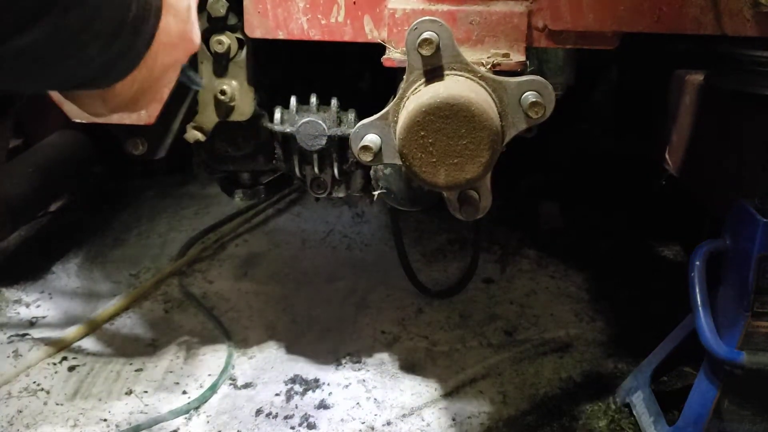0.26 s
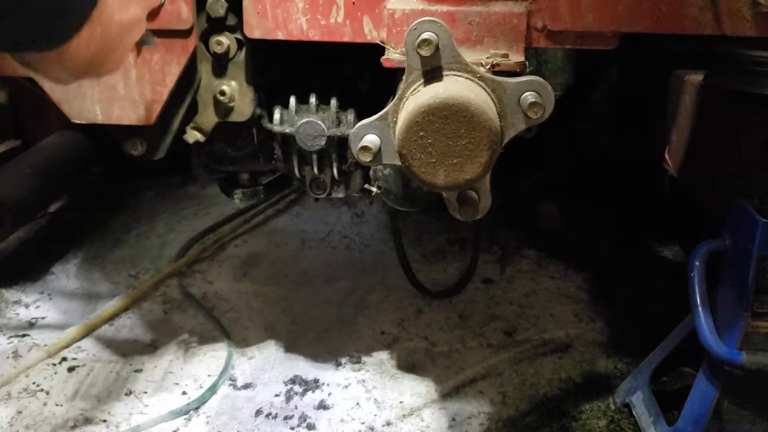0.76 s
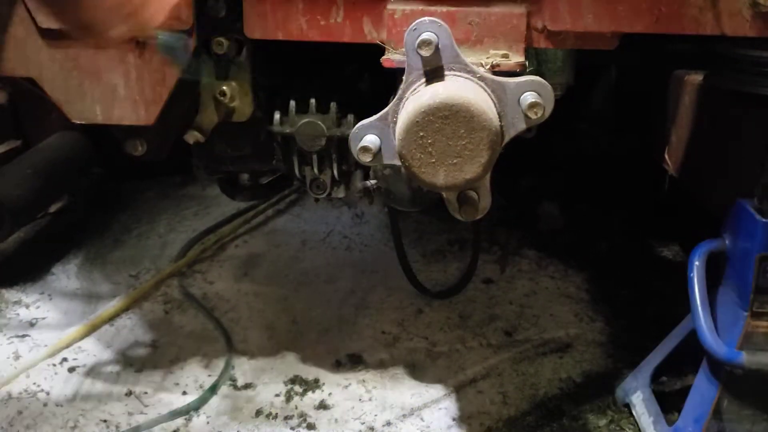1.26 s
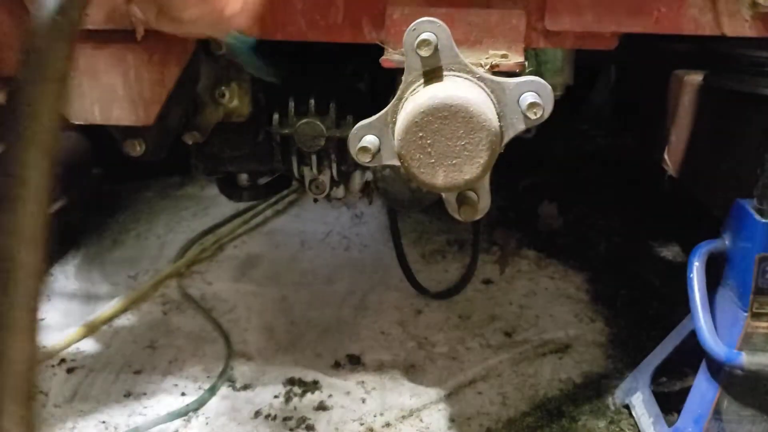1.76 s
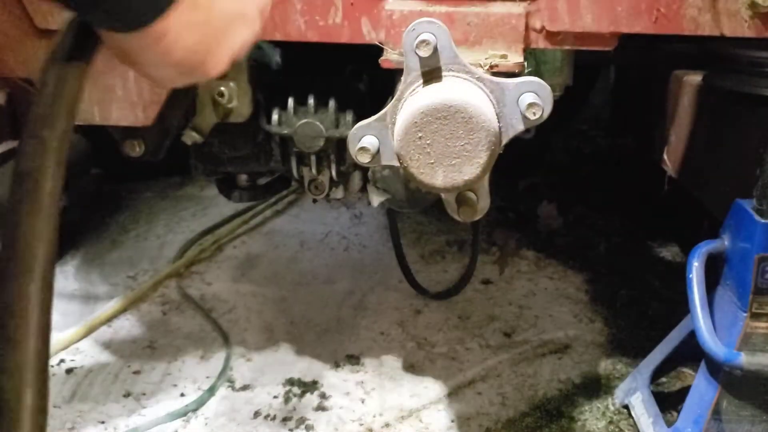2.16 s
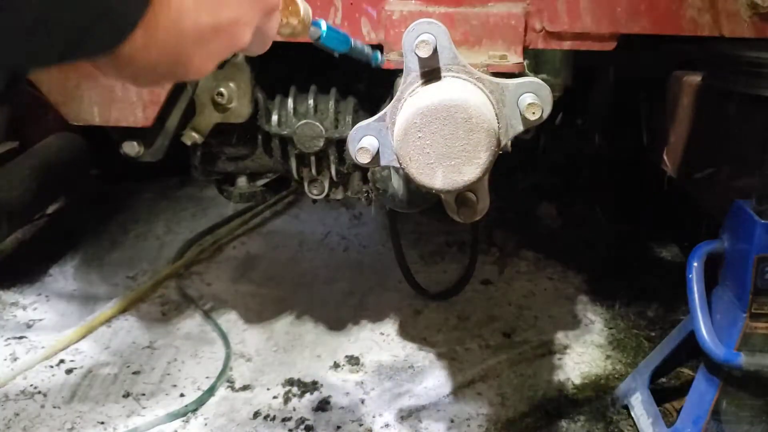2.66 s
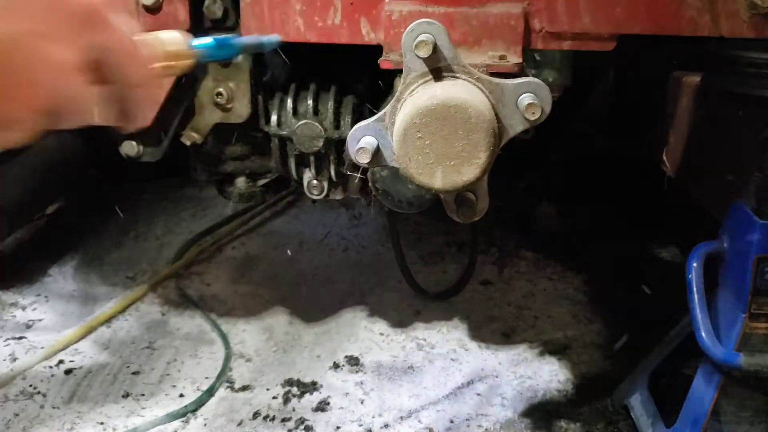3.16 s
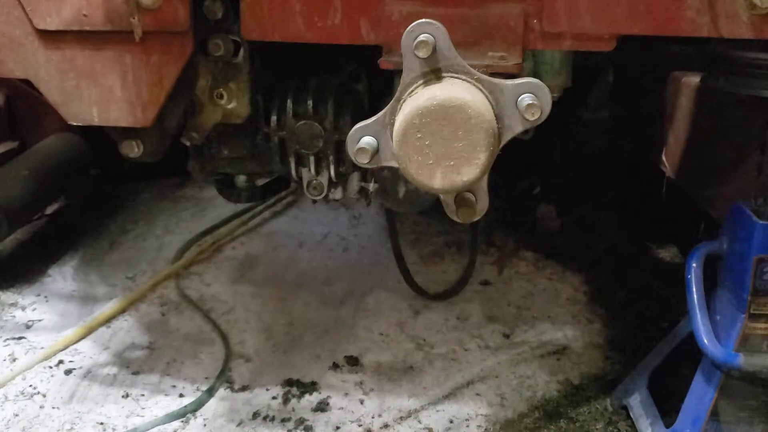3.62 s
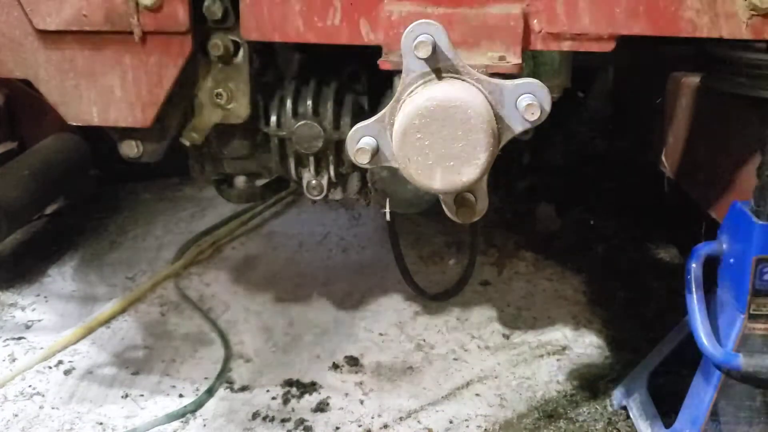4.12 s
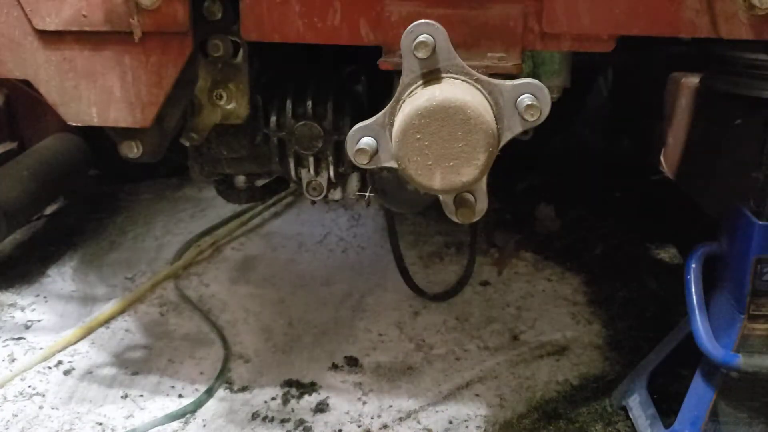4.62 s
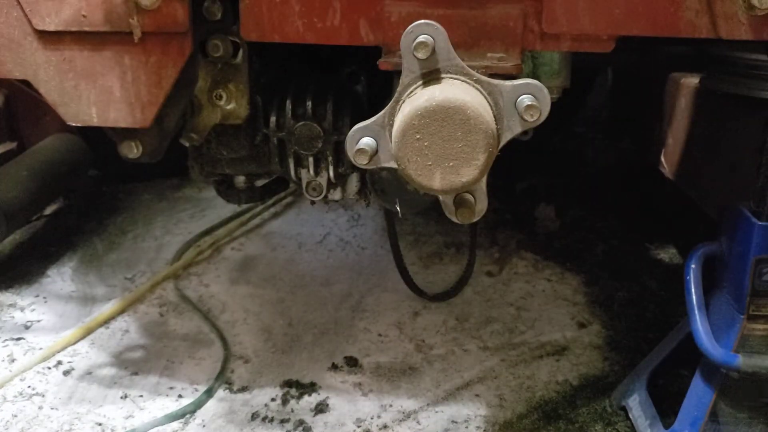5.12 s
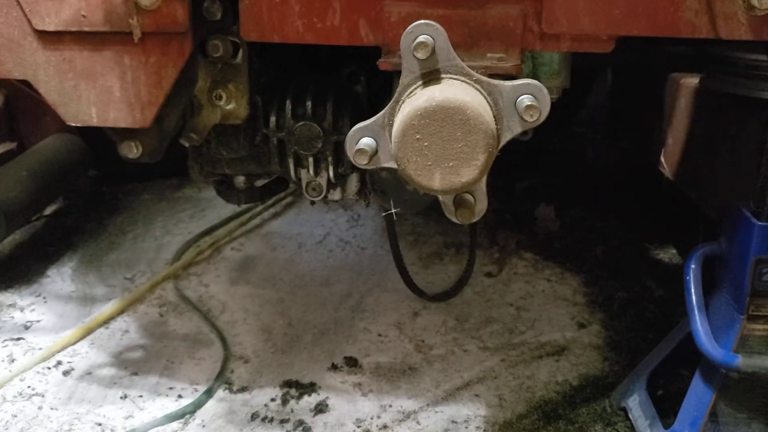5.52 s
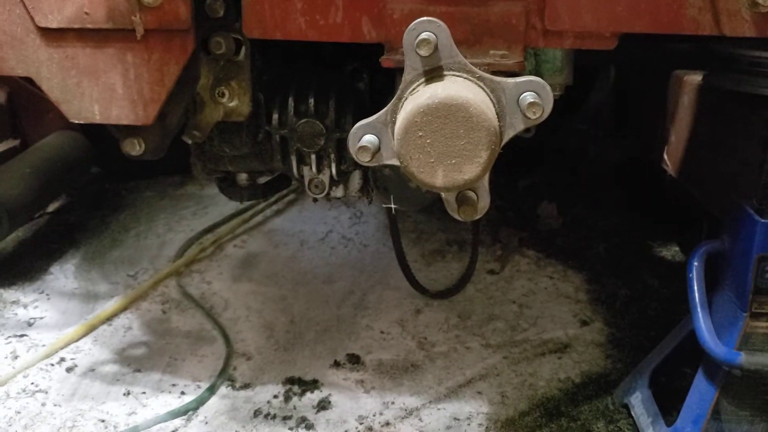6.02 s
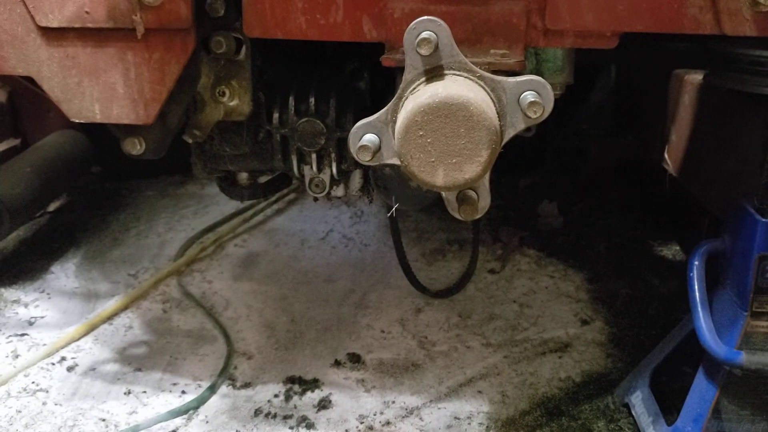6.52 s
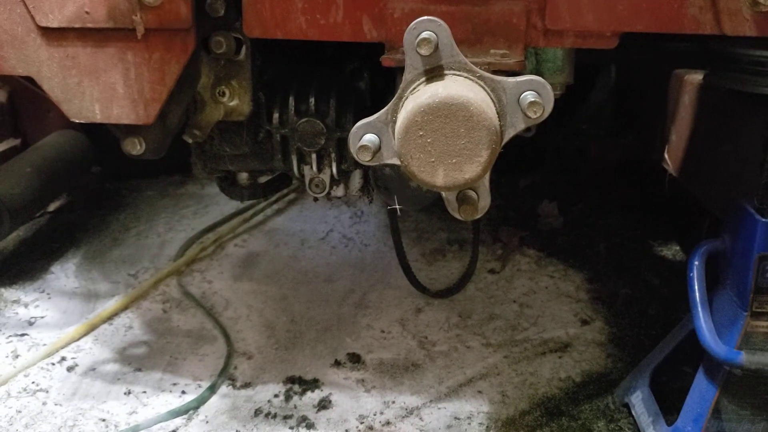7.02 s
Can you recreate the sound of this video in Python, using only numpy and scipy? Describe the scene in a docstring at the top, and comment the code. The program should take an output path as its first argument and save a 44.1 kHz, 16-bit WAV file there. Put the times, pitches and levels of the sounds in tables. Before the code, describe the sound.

A small air blow gun works close on the left over oily machinery in a garage. From 0 s a loud, very high hiss spits and flutters, rushing over metal edges in quick, irregular swells with dull puffs. From about 1.2 to 2.9 s the piercing hiss eases and hollow roaring grows, with short breathy notes sliding in pitch as the jet crosses cavities. Around 3.2 s a low, gusty whoosh swings past, sinking in pitch. From 3.5 s a thinner, steadier high hiss remains, becoming clearly weaker at 5 s. A faint rustle builds from 5.0 s to a soft, low thump at 5.4 s. Two sharp, bright metallic clacks follow at 5.8 and 5.9 s, the second stronger, with brief ringing and a short room tail. Weak hiss continues to 7.3 s, rising slightly, over quiet garage rumble and light microphone wind.

```python
"""A small blow gun, close by on the left, sweeps compressed air over oily machinery in a garage.
At first the nozzle hisses and spits very high, while the jet rushes over edges, roars and sings in hollows,
rumbles against broad parts and puffs in pockets: all shaped noise. Then it whooshes past, sinking in pitch.
Later it settles to a weaker hiss, with a soft rustle, a low thump (a fading sine and a dull knock) and two
sharp metallic clacks (noise ringing in metal modes). Low wind on the microphone and a garage rumble lie beneath."""
import sys
import numpy as np
from scipy import signal
from scipy.fft import rfft, irfft
from scipy.io import wavfile

SR = 44100
rng = np.random.default_rng(int(sys.argv[2]) if len(sys.argv) > 2 else 0)


def inscribe(sig):
    """Save sig as 16-bit PCM at rate SR to the path in sys.argv[1].

    A 1-D sig is mono; a 2-D sig holds one channel per row.
    Samples are clipped to [-1, 1] before scaling.
    """
    pcm = np.round(np.clip(np.atleast_2d(sig).T, -1, 1) * 32767)
    wavfile.write(sys.argv[1], SR, pcm.astype(np.int16))


N = 321048
TIME = np.arange(N) / SR   # seconds
HZ = np.maximum(np.arange(N // 2 + 1) * SR / N, 1)   # frequencies of the spectrum; 1 in place of 0 for the log

# In every colour table below, levels are relative: the noise is brought to a standard loudness afterwards.


def air_jet():
    """Four parts of one flow, fluttering more the harder the jet strikes the machine."""
    nozzle_db, edge_db, hollow_db = flow_levels()
    nozzle_pan, edge_pan = in_time(AIM)
    contact = np.clip((hollow_db + 60.0) / 12, .2, 1)   # how hard the jet strikes
    flutter = contact * drift(5.1)
    hiss = nozzle_hiss(nozzle_db, nozzle_pan, contact, flutter)
    rush = edge_rush(edge_db, edge_pan, contact, flutter)
    from_left = from_side(hiss + rush, in_time(EAR_DELAY)[0])
    return from_left + hollow_roar(hollow_db, contact, flutter) + buffet_rumble(contact)


# left-right balance as the gun moves: (time [s], nozzle left minus right [dB], edges left minus right [dB])
AIM = [(0.0, 8.5, -0.5), (2.25, 10.5, -4), (2.51, 4.5, -3), (2.66, 10, -2.5), (2.88, 7, -4), (3.81, 12, 3),
       (3.89, 12.5, 0), (4.46, 10, -2), (4.66, 15, -1), (4.95, 11, 1.0), (5.31, 12.5, 0), (5.98, 8.5, 1.5),
       (6.14, 12, 0), (7.28, 12, 1)]
# the gun is to the left, so its sound reaches the right ear later: (time [s], delay [s])
EAR_DELAY = [(0, 0.00016), (.9, .00022), (1.6, 0.00013), (2.6, 0.000046), (3.2, 0.000093), (3.9, 0.00022),
             (4.6, .00036), (5.4, 0.00042), (7.28, 0.0004)]

# hiss of the free jet as the hand sweeps, before trim: (time [s], level [dB])
NOZZLE = [(0.0, -21.5), (0.12, -22.5), (0.45, -28.5), (0.8, -28.5), (1.5, -35), (2.24, -35.5),
          (2.64, -31.5), (3.08, -33), (3.19, -26.5), (3.47, -29.5), (4.04, -26.5), (4.41, -29),
          (4.55, -26.5), (4.85, -27.5), (5.04, -35.5), (5.69, -37.0), (7.0, -34), (7.28, -31.5)]
# jet splitting on edges, before trim: (time [s], level [dB])
EDGES = [(0.0, -31.5), (0.4, -37.5), (0.81, -42), (1.2, -40.5), (1.5, -42), (1.88, -43.5), (2.39, -37),
         (2.95, -40.5), (3.61, -44.5), (4.29, -42), (4.91, -45), (5.06, -48.5), (5.7, -50), (6.4, -47.5),
         (6.99, -48.5), (7.28, -44.5)]
# jet blowing into hollows, before trim: (time [s], level [dB])
HOLLOWS = [(0.0, -38.5), (0.51, -45), (0.81, -53.5), (1.11, -49), (1.22, -38.5), (2.0, -40), (2.56, -37.5),
           (3.0, -46.5), (3.16, -45), (3.26, -49), (3.42, -56.5), (4.25, -53.5), (4.62, -56), (4.73, -57.5),
           (5.02, -61), (5.69, -62), (7.01, -59), (7.28, -57)]
# the jet crosses a bolt, rib or gap, and each part of the flow swells or drops:
# (middle time [s], length [s], nozzle change [dB], edges change [dB], hollows change [dB])
CROSSINGS = [(0.045, 0.068, -6, -3, 0), (0.144, 0.043, 4, 0.5, -4), (0.175, 0.02, -5.5, 0, 2),
             (0.2, 0.032, 1, 4.5, 0.5), (0.232, 0.043, 1, 1, 4), (0.306, 0.04, 5, -1.5, -6.5),
             (0.355, 0.012, 3, 4.5, 4), (0.426, 0.014, 2, -1, -5), (0.494, 0.015, 5, 3.5, -1),
             (0.521, 0.024, 2, 1.5, 6), (0.563, 0.036, -12, -7, -3.5), (0.587, 0.022, 5, 2.5, 0),
             (0.637, 0.046, 5.5, 0.5, 2), (0.68, 0.042, 2, 5.5, 4.5), (0.74, 0.11, -3.5, -5.5, -1.5),
             (0.955, 0.069, 6, 3.5, -2), (1.09, 0.071, 0, -4, -7), (1.133, 0.038, 4.5, 1, -9),
             (1.168, 0.017, 5.5, 4.5, -1), (1.242, 0.012, 2, -1, -4), (1.295, 0.039, 0.5, 6, 6.5),
             (1.354, 0.027, 1, 3, 4.5), (1.404, 0.04, 2, 4, 0), (1.455, 0.021, -2.0, -5, -7.5),
             (1.512, 0.014, 1, -2, 7), (1.573, 0.1, 4, 7, 1), (1.716, 0.012, -3, 1, 4.5),
             (1.865, 0.034, 0, 1, 4.5), (1.897, 0.017, 1, -6, -4), (2.033, 0.17, 2, 4.5, 2),
             (2.043, 0.042, -3.5, 1, 5.5), (2.155, 0.029, 0.5, -9, -6), (2.271, 0.11, -1, -11, -6.5),
             (2.37, 0.068, 9, 4.5, -2.5), (2.47, 0.083, 0.5, -7, -1.5), (2.56, 0.038, 1, -10, -2.5),
             (2.636, 0.073, 4, -1.5, -4.5), (2.732, 0.062, 3.5, 6, 3.5), (2.801, 0.056, 2.5, 4.5, 8),
             (3.32, .07, 2, 1, 0.5), (3.44, 0.083, 0, 1.5, 0), (4.567, .1, 1.5, -1, 0.5)]


def flow_levels():
    """Levels in dB of nozzle, edges and hollows: the slow sweep of the hand plus every crossing."""
    levels = np.array(in_time(NOZZLE) + in_time(EDGES) + in_time(HOLLOWS))
    for s, length_s, *change_db in CROSSINGS:
        levels += np.outer(change_db, swell(s, length_s))
    return levels


# colour of the free jet: (frequency [Hz], relative level [dB per Hz])
NOZZLE_COLOUR = [(6000, -20.5), (8500, -23.5), (10000, -14.5), (11500, -8.5), (13000, -4), (15000, 1),
                 (15700, 2.5)]


def nozzle_hiss(level_db, pan_db, contact, flutter):
    """Very high noise of the free jet, combed by shifting echoes off the metal."""
    echoed = reflected(garage(turbulence(NOZZLE_COLOUR)), share=0.35, path_s=0.0016, sway=.05)
    unsteady_db = 0.86 * flutter + 0.65 * contact * drift(64)
    return placed(echoed, pan_db) * from_db(level_db + 1.04 + unsteady_db)


# colour of the jet splitting on edges: (frequency [Hz], relative level [dB per Hz])
EDGE_COLOUR = [(1800, -7), (3200, -2), (4200, 1), (5400, 4), (7300, 4), (8400, -5), (10000, -8),
               (14000, -5)]
# sharp edges that colour the rush: (frequency [Hz], width [Hz], lift [dB], negative for a dip)
EDGE_MODES = [(3090, 87, 2.5), (4274, 90, 3), (4720, 90, 0.5), (5340, 630, 1), (6320, 25, -12),
              (7690, 250, 4.5)]


def edge_rush(level_db, pan_db, contact, flutter):
    """Noise of the jet splitting on sharp edges, which lift or weaken narrow bands."""
    echoed = reflected(garage(turbulence(EDGE_COLOUR, EDGE_MODES)), share=0.44, path_s=.002, sway=.05)
    unsteady_db = 1.9 * flutter + 1.0 * contact * drift(56)
    return placed(echoed, pan_db) * from_db(level_db + 0.58 + unsteady_db)


# colour of the jet in hollows: (frequency [Hz], relative level [dB per Hz])
HOLLOW_COLOUR = [(500, -43), (800, -5), (1050, -5.5), (1400, 1.5), (2200, 1.5), (3000, 0.5), (4000, -1.5),
                 (7000, -30)]
# resonances of the machine's recesses, also heard in other sounds: (frequency [Hz], width [Hz], lift [dB])
RECESSES = [(211, 20, 4.5), (363, 32, 4), (415, 8.2, 1.5), (495, 13, 7.5), (647, 56, 4), (760, 16, 0.5),
            (857, 43, 2), (1142, 15, 3), (1535, 60, 1)]


def hollow_roar(level_db, contact, flutter):
    """Noise of the jet blowing into hollows, where the recesses resonate."""
    roar = garage(reflected(turbulence(HOLLOW_COLOUR, RECESSES), share=0.34, path_s=.003, sway=.05))
    unsteady_db = 0.5 * flutter + 1.6 * contact * drift(47)
    return roar * from_db(level_db + 2.1 + unsteady_db)


# jet buffeting broad parts; the wind on the microphone follows it too: (time [s], level [dB])
BUFFET = [(0, -52.5), (.12, -45), (.3, -58), (1.15, -54.5), (1.8, -52), (2.3, -52), (2.53, -44.5),
          (2.68, -54.5), (2.96, -48), (3.04, -46), (3.16, -41.5), (3.24, -43), (3.35, -43.5), (3.46, -57.5),
          (3.75, -66), (4.55, -63.5), (4.74, -69.5), (7.28, -79)]
# colour of the buffeting: (frequency [Hz], relative level [dB per Hz])
BUFFET_COLOUR = [(50, -34), (110, -18), (210, 2.5), (280, 3.5), (500, 6), (800, 3.5), (1150, -0.5),
                 (2200, -0.5)]


def buffet_rumble(contact):
    """Low, unsteady noise of the jet pushing against broad parts."""
    level_db = in_time(BUFFET)[0] + 2.0 * contact * drift(40)
    return garage(turbulence(BUFFET_COLOUR, RECESSES)) * from_db(level_db)


# the hiss flares as the nozzle grazes an edge: (time [s], level [dB])
FLARES = [(0.284, -16), (0.398, -22), (0.425, -22), (0.649, -16), (0.881, -20), (1.326, -22)]


def flares():
    """Sudden spits of the highest hiss."""
    spits = bursts(FLARES, rise_s=0.00076, hold_s=0.0013, t60=0.037)
    return placed(turbulence(NOZZLE_COLOUR), pan_db=13) * spits


# the jet makes a hollow sing:
# (middle time [s], length [s], pitch at the middle [Hz], glide [octaves per s], level [dB])
HOLLOW_NOTES = [(1.295, 0.04, 1750, 0, -34), (1.527, 0.1, 1510, 0.18, -44), (1.763, 0.13, 1460, 0.96, -45),
                (2.05, 0.043, 2710, -0.15, -33), (2.047, 0.029, 4400, 0, -30.5),
                (2.156, 0.044, 1250, 0.26, -37.5), (2.22, 0.14, 1770, .8, -42.5),
                (2.322, .035, 1144, -0.082, -42), (2.382, 0.095, 2164, 0.98, -39),
                (2.563, 0.25, 2156, 0, -41.5), (2.77, 0.11, 2196, 0.46, -36.5),
                (2.859, 0.052, 780, -0.5, -40), (3.052, .08, 682, 0.042, -46),
                (3.225, .045, 650, 0.049, -35)]
NOTE_WIDTH_SHARE, NOTE_WANDER_SHARE = 0.082, 0.015   # of the pitch


def hollow_notes():
    """Breathy bands of noise whose pitch glides and wanders as the jet covers each opening."""
    out = np.zeros((2, N))
    for s, length_s, hz, glide, level_db in HOLLOW_NOTES:
        octaves = glide * np.clip(TIME - s, -length_s, length_s)
        pitch = hz * 2 ** octaves * (1 + NOTE_WANDER_SHARE * drift(12))
        out += narrow_band(pitch, NOTE_WIDTH_SHARE * hz) * swell(s, length_s) * from_db(level_db)
    return out


# the jet catches briefly in a pocket, before all puffs are turned down: (time [s], level [dB])
PUFFS = [(0.545, -27.5), (0.577, -30), (0.682, -37), (0.766, -26.5), (0.882, -35.5), (1.09, -29.5),
         (1.161, -32), (1.335, -25.5), (1.514, -27), (2.15, -33), (2.774, -26), (2.845, -27)]
# colour of the puffs: (frequency [Hz], relative level [dB per Hz])
PUFF_COLOUR = [(40, -7), (80, 3), (170, 2.5), (400, 1), (750, 2.5), (1100, -9), (2000, 2), (4000, -56)]


def puffs():
    """Short dull gusts as the jet crosses pockets in the casting."""
    air = turbulence(PUFF_COLOUR, RECESSES, own=0.36)   # ears partly differ
    return from_db(-11.5) * air * bursts(PUFFS, rise_s=0.0014, hold_s=0.0054, t60=0.12)


# the jet swings past close by: (middle of band [Hz], level [dB])
WHOOSH_BANDS = [(210, -38), (420, -36), (800, -37.5), (1500, -43.5)]
WHOOSH_S, WHOOSH_LENGTH_S, WHOOSH_LAG_S_PER_OCTAVE = 3.2, 0.081, 0.019   # second band starts at WHOOSH_S


def whoosh():
    """The jet swings past in a sudden, gusty roar; the low bands come last, so it sinks in pitch."""
    out = np.zeros((2, N))
    for hz, level_db in WHOOSH_BANDS:
        colour = [(hz / 2, -32), (hz / np.sqrt(2), -4), (hz, 0), (hz * np.sqrt(2), -4), (hz * 2, -20)]
        start_s = WHOOSH_S + WHOOSH_LAG_S_PER_OCTAVE * np.log2(WHOOSH_BANDS[1][0] / hz)
        envelope = bursts([(start_s, level_db)], rise_s=0.011, hold_s=WHOOSH_LENGTH_S, t60=0.37)
        out += turbulence(colour, RECESSES) * envelope
    gusts = from_db(1.5 * drift(45))
    return out * gusts


# the two metal clacks: (time [s], level [dB])
CLACKS = [(5.820, -23), (5.9345, -20)]
# colour of the instant of contact: (frequency [Hz], relative level [dB per Hz])
TICK_COLOUR = [(600, -3), (2000, -2), (7000, -3), (9000, -13), (13000, 15), (16000, 10)]
# colour of the crack: (frequency [Hz], relative level [dB per Hz])
CLACK_COLOUR = [(200, -21), (600, -10), (900, 1.5), (1300, -5), (3000, -9), (7000, -1), (8500, -17),
                (11000, -2), (13500, 15.5), (16000, -1)]
# what the struck metal rings with; each blow lands differently, and a negative lift is a dip:
# (frequency [Hz], width [Hz], lift at first blow [dB], lift at second blow [dB])
CLACK_MODES = [(770, 60, 8, 8), (878, 60, 7, 15.5), (990, 62, 8, 2), (1460, 65, 7, 13),
               (1740, 82, 11, 15.5), (1910, 60, 13, 11), (2208, 36, 17, -3), (2330, 42, 2, 15.5),
               (2860, 80, -3, 5), (3540, 40, 3, 13), (3900, 58, -5, 17.5), (4380, 35, 6, -4),
               (5540, 60, 11, 9), (6250, 110, 5, 10), (6850, 130, 17, 10)]
# colour of the garage's answer: (frequency [Hz], relative level [dB per Hz])
TAIL_COLOUR = [(120, -20), (330, -6.5), (900, -5.5), (2200, -0.5), (5000, -4), (9000, -10.5), (15000, -12)]
# the two modes that outlast the crack: (frequency [Hz], level relative to the blow [dB], time to fall 60 dB [s])
CLACK_RINGS = [(870, -23.5, 0.49), (2330, -31, 0.74)]
RING_WIDTH_HZ = 41   # to each side of the ring's pitch
TICK_ABOVE_CRACK_DB = -3   # negative: the tick is set lower
CLACK_EAR_DELAY_S = -.00012   # the clacks reach the right ear first


def clacks():
    """A tick of contact, a bright crack in the metal's modes, two wavering rings and a diffuse tail."""
    tick = placed(turbulence(TICK_COLOUR), pan_db=10) * from_db(TICK_ABOVE_CRACK_DB)
    out = tick * bursts(CLACKS, rise_s=.0001, hold_s=0.0008, t60=0.01)
    for k, blow in enumerate(CLACKS):
        modes = [(hz, width, lifts_db[k]) for hz, width, *lifts_db in CLACK_MODES]
        crack = turbulence(CLACK_COLOUR, modes) * bursts([blow], rise_s=0.0012, hold_s=0.0071, t60=0.12)
        room = garage(turbulence(TAIL_COLOUR, RECESSES) + 0.71 * turbulence(TAIL_COLOUR, modes))
        tail = from_db(-16.0) * room * bursts([blow], rise_s=0.004, hold_s=0.012, t60=0.52)
        out += crack + tail
    for hz, level_db, t60 in CLACK_RINGS:
        ring = narrow_band(hz, RING_WIDTH_HZ) * from_db(level_db)
        out += ring * bursts(CLACKS, rise_s=0.004, hold_s=0.01, t60=t60)
    return from_side(out, CLACK_EAR_DELAY_S)


# soft handling before the thump: (time [s], level [dB])
RUSTLE = [(4.97, -79), (5.07, -58.5), (5.2, -52.5), (5.3, -48), (5.36, -53.5), (5.42, -58.5), (5.58, -73)]
# colour of the rustle: (frequency [Hz], relative level [dB per Hz])
RUSTLE_COLOUR = [(120, -12), (260, -1), (600, -1), (950, -2), (1300, -5.5), (2500, -7)]
# resonances of the handled part, also heard in the knock: (frequency [Hz], width [Hz], lift [dB])
RUSTLE_MODES = [(273, 35, 6), (714, 36, 5.5)]


def rustle():
    """A soft, uneven rustle of noise that builds up and eases around the thump."""
    level_db, = in_time(RUSTLE)
    sounding = (TIME > RUSTLE[0][0]) & (TIME < RUSTLE[-1][0])
    return turbulence(RUSTLE_COLOUR, RUSTLE_MODES) * sounding * from_db(level_db + 1.2 * drift(25))


# colour of the dull knock: (frequency [Hz], relative level [dB per Hz])
KNOCK_COLOUR = [(120, 0), (400, -7), (750, -2), (1050, -4), (1500, -13), (4000, -6)]
THUMP_S, THUMP_HZ, THUMP_DB, THUMP_T60 = 5.437, 69, -48, .35   # the low boom


def thump():
    """A soft, dull knock of noise with a low boom, a sine that dies away."""
    boom = np.sin(2 * np.pi * THUMP_HZ * (TIME - THUMP_S))
    boom = boom * bursts([(THUMP_S, THUMP_DB)], rise_s=.004, hold_s=0.042, t60=THUMP_T60)
    knock = turbulence(KNOCK_COLOUR, RUSTLE_MODES)
    return boom + knock * bursts([(5.432, -45.5)], rise_s=0.0012, hold_s=0.0078, t60=0.24)


# air blows on the microphone in low gusts, before the lumps: (middle time [s], length [s], level [dB])
GUSTS = [(0.048, 0.15, -53), (0.23, 0.13, -51), (3.374, 0.1, -52), (3.554, 0.26, -58), (4.445, 0.29, -61.5),
         (4.994, 0.12, -62), (6.094, 0.15, -59)]
# colour of the wind on the microphone: (frequency [Hz], relative level [dB per Hz])
WIND_COLOUR = [(25, -24), (60, -5.5), (115, 2), (170, 1), (260, -8), (500, -20)]
WIND_BELOW_BUFFET_DB = -14   # between gusts the wind follows the buffeting


def microphone_wind():
    """Lumpy low air on the microphone, partly different at each ear: a share of the buffeting, and gusts."""
    steady = from_db(in_time(BUFFET)[0] + WIND_BELOW_BUFFET_DB)
    gusts = sum(from_db(level_db) * swell(s, length_s) for s, length_s, level_db in GUSTS)
    lumps = from_db(1.5 * drift(13))
    return turbulence(WIND_COLOUR, own=0.17) * np.hypot(steady, gusts) * lumps


# colour of the garage's low rumble: (frequency [Hz], relative level [dB per Hz])
GARAGE_COLOUR = [(20, -27), (40, -1.5), (70, 1), (115, 0), (180, -10.5), (300, -12), (1000, -12)]
GARAGE_DB = -65


def garage_rumble():
    """The garage's steady low rumble, as quiet noise."""
    return from_db(GARAGE_DB) * turbulence(GARAGE_COLOUR, own=0.1)


# how alike the two ears are: (frequency [Hz], left-right likeness [0 to 1])
LIKENESS = [(30, 1), (120, 1), (300, 0.93), (650, 0.76), (1400, 0.45), (3000, 0.38), (7000, 0.25),
            (15000, 0.19)]
# shading on the far side from the gun: (frequency [Hz], right minus left [dB])
SHADE = [(100, -1.5), (300, -2.5), (700, -2), (1300, -4), (2500, -1.5), (3500, -0.5), (4700, 4), (6200, 0),
         (7500, -12.5), (8500, -8.5), (10000, -6), (12000, -5.5), (14500, -12), (16000, -5.5)]


def turbulence(colour, modes=(), own=0):
    """Coloured stereo noise, lifted at resonances and shaded on the right; its middle has rms 1."""
    gain = from_db(at_hz(colour, beyond=-70))
    for hz, width, lift_db in modes:
        gain = gain * (1 + (from_db(lift_db) - 1) / (1 + (2 * (HZ - hz) / width) ** 2))
    alike = np.clip(at_hz(LIKENESS) * (1 - own), -1, 1)   # own makes the ears less alike
    white = rng.standard_normal((2, 2 * len(HZ))).view(complex)
    mid, side = white * gain * np.sqrt([1 + alike, 1 - alike])
    pair = irfft(np.array([mid + side, (mid - side) * from_db(at_hz(SHADE))]), N)
    return pair / pair.mean(0).std()


def narrow_band(hz, width_hz):
    """Stereo noise of rms 1 around a steady or moving pitch: a wave whose strength drifts by chance."""
    phase = 2 * np.pi * np.cumsum(hz * np.ones(N)) / SR
    cos, sin = np.cos(phase), np.sin(phase)
    return np.array([drift(width_hz) * cos + drift(width_hz) * sin for ear in range(2)])


def drift(rate, order=24):
    """Smooth chance of spread 1 that changes about rate times a second."""
    white = rfft(rng.standard_normal(N // order))   # made at a lower sample rate, then filled in
    slow = irfft(white / (1 + (HZ[:len(white)] / rate) ** 2))
    return np.interp(np.arange(N) / order, np.arange(len(slow)), slow / slow.std())


def bursts(events, rise_s, hold_s, t60):
    """Envelope of blows that rise, last a moment and die away by 60 dB in t60 seconds."""
    power = np.zeros(N)
    age = TIME[:SR]   # each blow lasts a second at most
    shape = (1 - np.exp(-age / rise_s)) * from_db(-60 * np.maximum(age - hold_s, 0) / t60)
    for s, level_db in events:
        start = round(s * SR)
        power[start:start + SR] += (from_db(level_db) * shape) ** 2
    return np.sqrt(power)


SWELL_STEEPNESS = 3.1   # 2 is a round swell, more is flat-topped


def swell(s, length_s):
    """A smooth rise to 1 and fall, above half height over the given length."""
    near, out = np.abs(TIME - s) < 2 * length_s, np.zeros(N)
    out[near] = .5 ** (np.abs(2 * (TIME[near] - s) / length_s) ** SWELL_STEEPNESS)
    return out


def reflected(pair, share, path_s, sway, count=3):
    """Echoes off nearby metal comb the noise; their paths change slowly by chance."""
    out = pair.copy()
    for k in range(count):
        wander = drift(.7)
        for ear in range(2):
            lag = path_s * (k + rng.uniform(.5, 1)) * (1 + sway * wander)
            out[ear] += share * delayed(pair[ear], lag)
    return out / np.sqrt(1 + count * share ** 2)


ECHO_SWAY_S = .00012   # the echo paths lengthen and shorten slowly by chance


def garage(pair, share=0.12, count=8):
    """Early echoes off floor, bodywork and walls, different at each ear and slowly shifting."""
    out = pair.copy()
    swayed = delayed(pair, ECHO_SWAY_S * drift(.7))
    for k in range(count):
        for ear in range(2):
            lag = round(rng.uniform(.004, .028) * SR)
            out[ear] += share * (-1) ** k * np.roll(swayed[ear], lag)
    return out / np.sqrt(1 + count * share ** 2)


def placed(pair, pan_db):
    """Move a steady noise to a left-right balance, both ears first made equally loud."""
    sides = from_db(np.array([[1], [-1]]) * pan_db / 2)
    return 2 * pair / pair.std(1, keepdims=True) * sides / np.hypot(*sides)


def from_side(pair, delay_s):
    """The right ear hears it later than the left, or earlier if the delay is negative."""
    return np.array([pair[0], delayed(pair[1], delay_s)])


def delayed(sound, delay_s):
    """Sound arriving late by a steady or changing time, to the nearest sample; the ends join up."""
    return sound[..., np.rint((TIME - delay_s) * SR).astype(int) % N]


def from_db(db):
    """Decibels to gain."""
    return 10 ** (np.asarray(db) / 20)


def in_time(rows):
    """Each column of a time table at every sample."""
    s, *columns = np.transpose(rows)
    return [np.interp(TIME, s, c) for c in columns]


def at_hz(points, beyond=None):
    """A frequency table at every frequency, with straight lines on a log scale."""
    hz, value = np.transpose(points)
    return np.interp(np.log(HZ), np.log(hz), value, left=beyond, right=beyond)


def scene():
    """The air work and the knocks over the garage's low rumble."""
    air = air_jet() + flares() + hollow_notes() + puffs() + whoosh() + microphone_wind()
    return air + clacks() + rustle() + thump() + garage_rumble()


def record(dry):
    """The top is cut steeply above 15850 Hz."""
    return signal.sosfilt(signal.ellip(12, .1, 75, 15850, fs=SR, output="sos"), dry)


dry = scene()
out = record(dry)
inscribe(out)
```